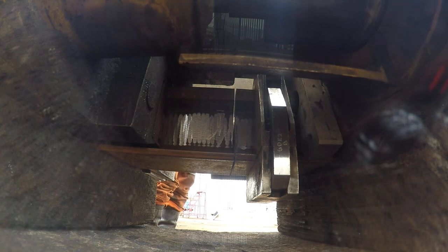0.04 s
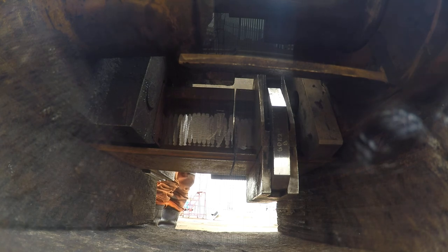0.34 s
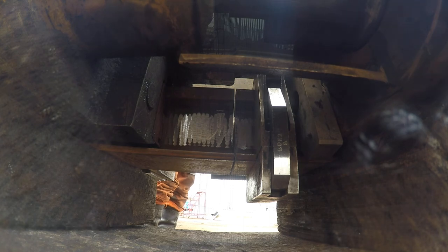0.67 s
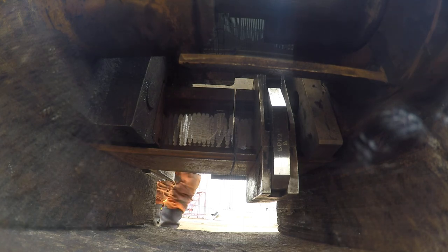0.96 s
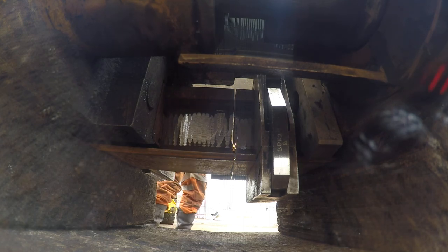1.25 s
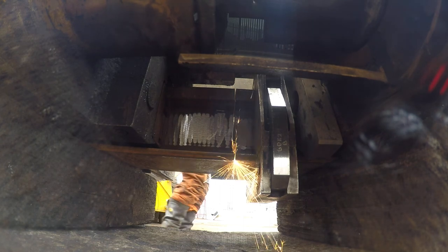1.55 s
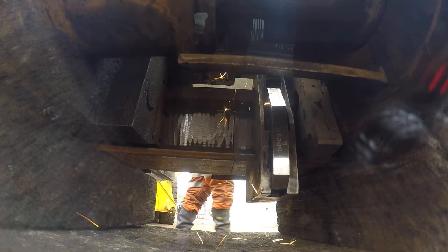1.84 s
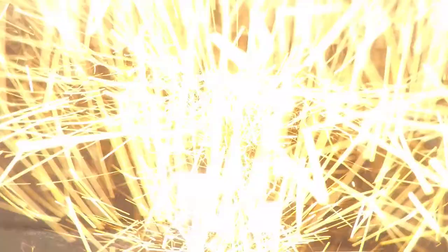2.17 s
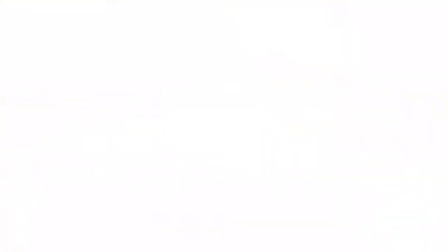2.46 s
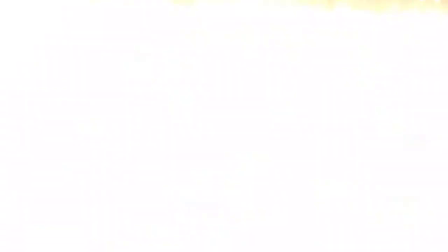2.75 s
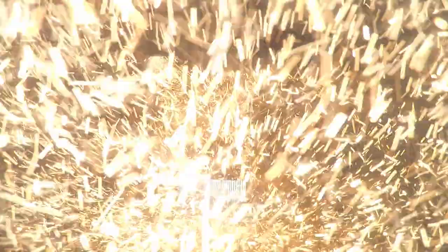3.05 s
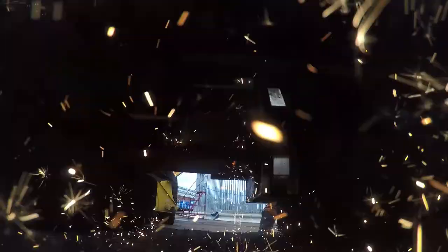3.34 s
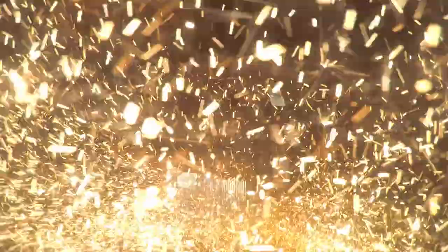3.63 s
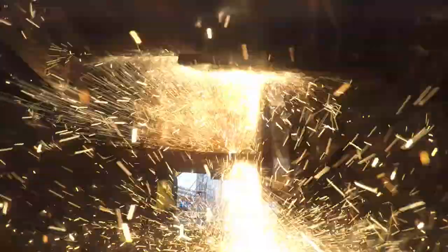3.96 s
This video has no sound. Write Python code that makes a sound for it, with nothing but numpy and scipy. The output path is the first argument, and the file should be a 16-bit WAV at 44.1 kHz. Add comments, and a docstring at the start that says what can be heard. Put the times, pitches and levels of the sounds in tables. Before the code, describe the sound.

A welding machine ticks and crackles, then fires volleys of loud, sharp cracks with hissing sparks and pattering molten drops. It is heard close up inside the steel housing, over a low machine hum and workshop rumble.

```python
"""Inside the steel housing of a flash butt welder, with a workshop rumbling behind it.
The steel ends first touch with small ticks; then molten bridges burst, singly and in volleys,
and ring the housing. Between the bursts a spray of sparks hisses and heavy drops patter on the steel.
Underneath, the drive hums and drones under load."""
import sys
import numpy as np
from scipy import signal
from scipy.fft import rfft, irfft
from scipy.io import wavfile
from scipy.ndimage import uniform_filter1d

SR = 44100
rng = np.random.default_rng(int(sys.argv[2]) if len(sys.argv) > 2 else 0)


def put_to_file(sound):
    """Save the sound as 16-bit audio at rate SR, in the file named by the first command-line argument."""
    columns = np.atleast_2d(sound).T  # one column per channel
    safe = np.clip(columns, -1, 1)
    whole_steps = np.round(safe * 32767)
    wavfile.write(sys.argv[1], SR, whole_steps.astype(np.int16))


N = 176400
BODY_T60_S, BRIGHT_T60_S = 0.026, 0.022  # thin bright snaps die sooner

# cues for the bursting bridges: start_s, level_db, treble_offset_db, bass_offset_db
BURSTS = [(1.868,4.5,-7.5,-50), (2.018,4.5,-11.5,-30), (2.1014,1.5,-11.5,-18), (2.16,-8.5,-8.5,-25.5),
          (2.192,-6.5,-5,-8.5), (2.236,2,-8,-23), (2.3099,-2,-7.5,-20), (2.318,-13,-2,-17.5),
          (2.327,-9.5,-10,-14), (2.336,-14,-9,-19), (2.342,-8,-6.5,-18.5), (2.411,-3,-11,-16),
          (2.429,-14,-26,-15), (2.433,-8,-14,-34), (2.444,-18.5,-11,-20), (2.469,-6.5,-9.5,-21.5),
          (2.477,-13,-5,-26), (2.485,-7,-12,-23), (2.494,-14.5,-18,-20), (2.503,-6.5,-8.5,-15),
          (2.51,-11.5,-16,-13.5), (2.5207,-6.5,-9.5,-17), (2.53,-10,-6,-10), (2.5382,-5,-9,-24),
          (2.547,-24,1,-7), (2.5528,-1,-40,-21.5), (2.566,-21,-17,0.5), (2.8444,-3,-9.5,-24),
          (2.852,-1,-15,-16), (2.956,-7.5,-10.5,-24), (3.001,1.5,-10,-26), (3.008,-16,4,-15),
          (3.028,-7,-9,-25), (3.036,1,-12,-22.5), (3.046,-10,-9,-24), (3.053,0.5,-15.5,-23),
          (3.071,-8,-11,-11.5), (3.081,-14.5,-9.5,-11.5), (3.5494,4,-14.5,-22.5), (3.559,-6.5,-6,-18),
          (3.566,-18,-19,-8), (3.76,-8,-6.5,-33), (3.785,-4,-21,-19.5), (3.791,-9,-10,-27),
          (3.819,-4.5,-12.5,-25)]
# the band where the cracks bite hardest, shifting as the gap burns away: time_s, centre_hz, boost_db
BITE = [(2.24, 3000, -1), (2.31, 1980, 9), (2.41, 3850, -2), (2.55, 3840, 4.5), (3.04, 2040, 0.5),
        (3.55, 2950, 4.5), (3.79, 2900, -0.5)]
# EQ for each of a burst's four layers: freq_hz, gain_db
CRACK_EQ = [(300,-27), (900,-20.5), (1500,-7.5), (2200,-1.5), (2800,0), (3450,-2.5), (4500,-1),
            (4950,-13.5), (6500,-6.5), (8500,-14), (15000,-8.5)]
SIZZLE_EQ = [(1000,-40), (3800,4), (5500,13), (7000,13.5), (8700,5.5), (10500,12), (13000,4.5),
             (15000,-10.5)]
BLAST_EQ = [(60,6.5), (150,-7), (280,-6.5), (400,-1), (620,-1), (800,-3), (1100,-10.5), (2500,-6.5),
            (8000,-41)]
THUMP_EQ = [(30,-14), (90,2.5), (170,5), (280,4.5), (450,-0.5), (750,-15), (1200,-32.5), (4000,-41)]
# steel panels that ring on: pitch_hz, offset_db, t60_s
PANELS = [(636,-40,0.088), (1400,-51,0.13), (1855,-27,0.16), (1860,-49,0.17), (1985,-38,.12),
          (2800,-35,0.15), (4150,-38,0.12), (5480,-18,0.035)]
# puffs of gas that rock the air after big bursts: start_s, level_db
PUFFS = [(2.335,-28), (2.528,-18), (2.569,-14), (2.854,-5.5), (3.09,-22), (3.561,-25)]

def bursts():
    """Each molten bridge goes off with a crack, sizzle, gas blast and thump, and rings the panels."""
    start_s, level_db, treble_db, bass_db = np.transpose(BURSTS)
    bite_hz, bite_db = (curve[(start_s * SR).astype(int), None] for curve in automation(BITE))
    bite = [(bite_hz, 800, bite_db)]  # 800 Hz wide
    crack = equalise(snaps(start_s, level_db - 10.5, BODY_T60_S, bite), CRACK_EQ)
    sizzle = equalise(snaps(start_s, level_db + treble_db - 2, BRIGHT_T60_S), SIZZLE_EQ)
    blast = equalise(snaps(start_s, level_db + bass_db - 0.5, BODY_T60_S), BLAST_EQ)
    pressure_pulse = impulses(start_s + 0.00088, level_db + bass_db + 21)
    thump = equalise(pressure_pulse, THUMP_EQ)
    panels = sum(ring(start_s, level_db + offset_db, hz, t60_s) for hz, offset_db, t60_s in PANELS)
    puffs = ring(*np.transpose(PUFFS), pitch_hz=21, t60_s=0.1)
    return crack + sizzle + blast + thump + panels - puffs


# cues for the first contacts: start_s, level_db
TICKS = [(1.143,-37), (1.1768,-29.5), (1.272,-35), (1.319,-34.5), (1.393,-32.5), (1.443,-41), (1.454,-35),
         (1.493,-30), (1.502,-1.5), (1.568,-13), (1.602,-11.5), (1.626,-24), (1.644,-15.5), (1.6658,-4.5),
         (1.718,-20), (1.727,-19), (1.782,-28), (1.798,-16), (1.831,-16), (1.845,-15.5), (1.973,-19),
         (1.983,-11)]
# fader for the crackle of many small contacts: time_s, level_db
CRACKLE_FADER = [(1.251,-62), (1.5,-49), (1.68,-51), (1.8,-33.5), (1.93,-94), (2.15,-28), (2.279,-58),
                 (2.335,-14.5), (2.39,-43.5), (2.52,-48), (2.618,-44)]
# bright EQ for ticks and crackle: freq_hz, gain_db
TICK_EQ = [(300,-9.5), (1000,-15), (1500,-7.5), (2200,-1.5), (4000,-1.5), (5000,0), (6500,3.5), (8700,-5.5),
           (11000,0.5), (15000,-7)]

def contact_ticks(crackle_count=200, spread_db=8.5, trim_db=-11.5):
    """Thin bright snaps as the steel ends touch, with a fine random crackle between them."""
    tick_s, tick_db = np.transpose(TICKS)
    fader_s, fader_db = np.transpose(CRACKLE_FADER)
    slots = (np.arange(crackle_count) + rng.random(crackle_count)) / crackle_count
    crackle_s = fader_s[0] + slots * (fader_s[-1] - fader_s[0])
    crackle_db = np.interp(crackle_s, fader_s, fader_db) + spread_db * rng.standard_normal(crackle_count)
    contacts = snaps(np.r_[tick_s, crackle_s], np.r_[tick_db, crackle_db] + trim_db, BRIGHT_T60_S)
    return equalise(contacts, TICK_EQ)


# fader for the spray of sparks: time_s, level_db
SPARK_FADER = [(0.8, -63), (1.2, -60.5), (1.8, -51), (2.3, -62), (2.45, -45), (2.57, -37.5), (2.63, -40),
               (2.82, -41), (2.87, -27), (2.94, -34), (2.99, -33), (3.07, -27), (3.12, -38.5), (3.3, -38),
               (3.52, -39), (3.59, -33), (3.74, -34.5), (3.85, -31.5), (3.92, -37.5), (4, -39)]
# scooped EQ for the hiss: freq_hz, gain_db
SPARK_EQ = [(150, 0.5), (400, -6), (900, -23), (1500, -10), (2800, -1), (3600, 1.5), (4500, -5),
            (5000, -3.5), (7000, -8.5), (10000, -9.5), (15000, -14)]

def sparks():
    """Thousands of tiny sparks merge into a grainy hiss."""
    return grains(SPARK_FADER, SPARK_EQ, per_s=14000, spread_db=2.0)


# fader for the falling drops: time_s, level_db
DROP_FADER = [(2.28,-78), (2.33,-32.5), (2.39,-72), (2.46,-36), (2.555,-25), (2.6,-43.5), (2.82,-80),
              (2.86,-30.5), (2.92,-40), (3.07,-38.5), (3.19,-47.5), (3.53,-43.5), (3.56,-52), (3.61,-39),
              (3.75,-43), (3.79,-35), (3.86,-34), (3.92,-42.5), (4,-44.5)]
# dark EQ for the patter: freq_hz, gain_db
DROP_EQ = [(70,9), (150,-0.5), (290,3.5), (400,-8.5), (700,-4), (1000,-4.5), (1800,-5.5), (3300,-8),
           (5000,-11.5), (15000,-21)]

def molten_drops():
    """Heavy molten drops land on the steel in a dull patter."""
    return grains(DROP_FADER, DROP_EQ, per_s=4300, spread_db=4.5)


# partials of the drive hum: pitch_hz, level_db
HUM = [(43.1,-47.5), (82.5,-45.5), (89.2,-47), (118.4,-56.5), (166.9,-50.5), (247.6,-57), (586.8,-62.5),
       (1325,-64.5), (1855,-64.5)]
# glides and swells under load: time_s, pitch_hz, level_db
LOW_DRONE = [(2.8, 81.9, -79), (2.89, 81, -26), (3.05, 81.5, -33), (3.15, 81.5, -35), (3.33, 81.5, -73),
             (3.44, 81.4, -34.5), (3.6, 83.5, -37), (3.78, 83, -32), (3.82, 81.8, -43), (4, 79, -62)]
HIGH_DRONE = [(2.5, 115.8, -47), (2.63, 114.1, -42), (2.82, 111.2, -37), (2.93, 113.7, -56),
              (3.07, 116.8, -32), (3.25, 112.4, -38.5), (3.42, 104.8, -37.5), (3.55, 117.7, -38.5),
              (3.65, 108.7, -67), (4, 107.3, -58)]
WHINE = [(3.14, 915, -70), (3.23, 915, -64), (3.39, 882, -56), (3.48, 852, -70)]

def drive():
    """The drive's beating hum, two drones that swell under load, and a faint sinking whine."""
    hum = sum(tone(hz, db, waver_hz=0.31, waver_db=1.05) for hz, db in HUM)
    under_load = sum(tone(*automation(curve), waver_hz=0.17, waver_db=-1.75)
                     for curve in (LOW_DRONE, HIGH_DRONE, WHINE))
    return hum + under_load


# EQ for the room tone of the hall: freq_hz, gain_db
ROOM_EQ = [(15,-11), (26,-16), (38,-10.5), (60,-8.5), (91,-12), (142,-10), (200,-13.5), (250,-15),
           (320,-18.5), (450,-22), (580,-21), (740,-26), (1050,-35.5), (1330,-21.5), (1550,-31.5),
           (1850,-21.5), (2050,-29), (2500,-21.5), (3500,-28.5), (4300,-30.5), (5000,-40.5), (6500,-42),
           (8500,-56), (11000,-72), (15000,-75)]

def workshop():
    """Steady rumble and rush of the hall, and one faint knock."""
    knock = ring(start_s=np.array([0.865]), level_db=-42, pitch_hz=385, t60_s=0.08)
    room_tone = equalise(rng.standard_normal(N), ROOM_EQ) * from_db(-45)
    return knock + room_tone


# air resonances of the housing, heard in snaps and grains: centre_hz, width_hz, boost_db
HOUSING = [(634.3,33.3,16), (1326,110,11.5), (1835,130,14.5), (2038,59,8), (2440,136,6.5), (2720,180,7),
           (3010,260,7), (3212,152,10), (3730,59,6), (4055,144,11.5), (4360,156,11), (5456,145,10.5),
           (5950,94,7), (6440,175,7), (6575,380,3.5), (6960,150,-0.5), (7780,190,5.5), (9940,600,4),
           (11870,290,-0.5), (12900,350,5.5)]

def snaps(start_s, level_db, t60_s, bite=()):
    """Each snap scatters between the close steel walls: quick attack, fast decay, faint tail."""
    attack_s, hold_s, tail_db, tail_t60_s = 0.0011, 0.0017, -25.5, 0.11
    length, smooth_bins = 8192, 41
    t, freq_hz = np.arange(length) / SR, np.fft.rfftfreq(length, 1 / SR)
    fall = np.log(1000) * np.maximum(t - hold_s, 0)
    decay = np.exp(-fall / t60_s) + from_db(tail_db) * np.exp(-fall / tail_t60_s)
    envelope = np.minimum(t / attack_s, 1) * decay
    colour = unit_rms(from_db(bells_db(freq_hz, HOUSING))) * from_db(bells_db(freq_hz, bite))
    colour_power = uniform_filter1d(colour ** 2, smooth_bins) * np.sum(envelope ** 2)
    scatter = rfft(rng.standard_normal((len(start_s), length))) * colour
    for _ in range(3):  # even out chance peaks, so all snaps share the colour of the housing
        power = np.abs(rfft(irfft(scatter) * envelope)) ** 2
        scatter *= np.sqrt(colour_power / uniform_filter1d(power, smooth_bins))
    track = np.zeros(N + length)
    for start, gain, noise in zip((start_s * SR).astype(int), from_db(level_db), irfft(scatter)):
        track[start:start + length] += gain * envelope * noise
    return track[:N]


def grains(fader, eq, per_s, spread_db):
    """A dense cloud of random clicks, coloured by the housing."""
    level_db, = automation(fader)
    sizes = from_db(spread_db * np.minimum(rng.exponential(1, N), 5)) * rng.standard_normal(N)
    cloud = unit_rms(sizes * (rng.random(N) < per_s / SR))
    return equalise(cloud * from_db(level_db), eq, HOUSING)


def ring(start_s, level_db, pitch_hz, t60_s):
    """A decaying sine struck at the given times and levels."""
    radius, angle = from_db(-60 / (t60_s * SR)), 2 * np.pi * pitch_hz / SR
    feedback = [1, -2 * radius * np.cos(angle), radius ** 2]
    return signal.lfilter([0, np.sin(angle)], feedback, impulses(start_s, level_db))


def impulses(start_s, level_db):
    """One impulse for each cue."""
    track = np.full(N, 1e-18)
    track[(start_s * SR).astype(int)] = from_db(level_db)
    return track


def tone(pitch_hz, level_db, waver_hz, waver_db):
    """A sine that wavers in pitch and level."""
    amplitude = np.sqrt(2) * from_db(level_db + waver_db * drift(rate_hz=3.6))
    cycles = np.cumsum(pitch_hz + waver_hz * drift(rate_hz=2.9)) / SR
    return amplitude * np.sin(2 * np.pi * cycles)


def drift(rate_hz):
    """Slow random modulation at unit rms."""
    rolloff = 1 + (np.fft.rfftfreq(2 * N, 1 / SR) / rate_hz) ** 2
    return unit_rms(irfft(rfft(rng.standard_normal(2 * N)) / rolloff)[:N])


def equalise(x, eq, resonances=()):
    """Minimum-phase EQ with optional resonances; white noise keeps its power."""
    freq_hz = np.fft.rfftfreq(2 * N, 1 / SR) + 1e-3
    eq_hz, eq_db = np.transpose(eq)
    gain_db = np.interp(np.log(freq_hz), np.log(eq_hz), eq_db) + bells_db(freq_hz, resonances)
    cepstrum = irfft(np.log(unit_rms(from_db(gain_db))))
    response = np.exp(rfft(np.r_[cepstrum[0], 2 * cepstrum[1:N]], 2 * N))
    return irfft(rfft(x, 2 * N) * response)[:N]


def bells_db(freq_hz, resonances):
    """Summed boost of bell-shaped resonances at each frequency."""
    return sum(boost / (1 + (2 * (freq_hz - centre) / width) ** 2) for centre, width, boost in resonances)


def automation(breakpoints):
    """Ramp each column between its breakpoints, sample by sample."""
    time_s, *columns = np.transpose(breakpoints)
    return [np.interp(np.arange(N) / SR, time_s, column) for column in columns]


def from_db(db):
    """Decibels to gain."""
    return 10 ** (np.asarray(db) / 20)


def unit_rms(x):
    """Scale to unit rms."""
    return x / np.sqrt(np.mean(x ** 2) + 1e-20)


def scene():
    """All layers mixed to mono."""
    return (contact_ticks() + bursts() + sparks() + molten_drops() + drive() + workshop())[None]


def record(dry):
    """The microphone thins the sub-bass, soft-clips the loudest cracks and cuts the top."""
    low_cut_hz, ceiling, high_cut_hz = 38, 0.98, 15300
    low_cut = signal.butter(1, low_cut_hz, "high", fs=SR, output="sos")
    high_cut = signal.ellip(10, 0.1, 80, high_cut_hz, fs=SR, output="sos")
    clipped = ceiling * np.tanh(signal.sosfilt(low_cut, dry) / ceiling)
    return signal.sosfilt(high_cut, clipped)


dry = scene()
out = record(dry)
put_to_file(out)
```